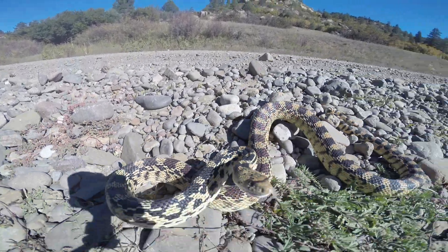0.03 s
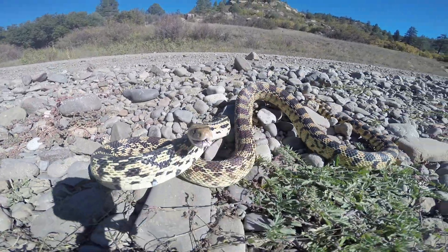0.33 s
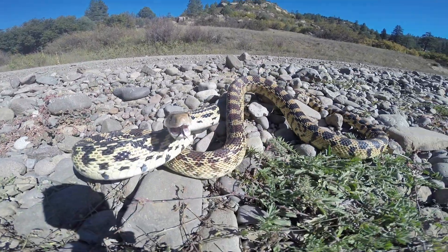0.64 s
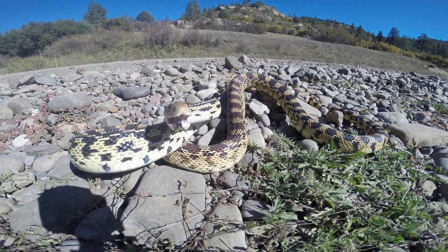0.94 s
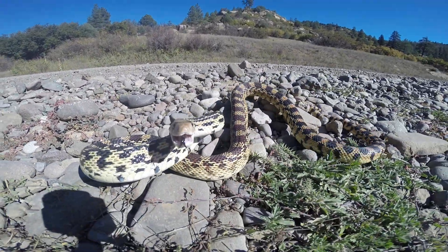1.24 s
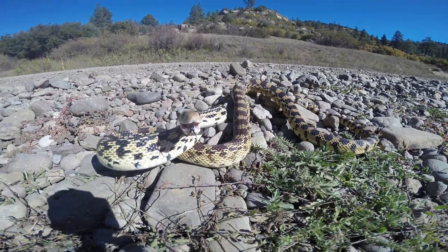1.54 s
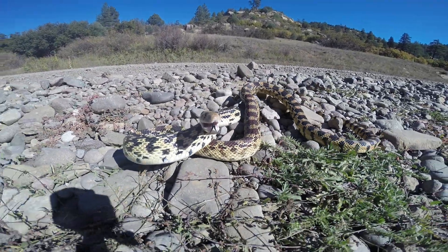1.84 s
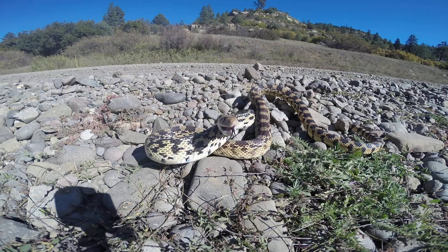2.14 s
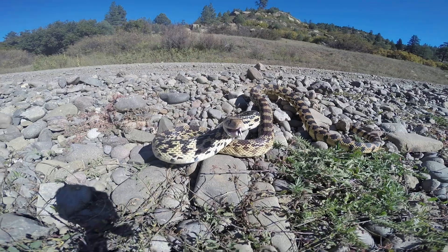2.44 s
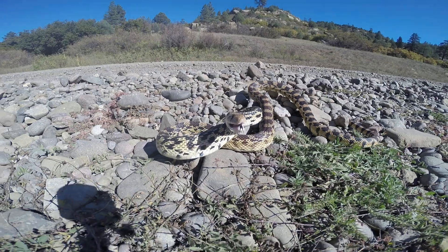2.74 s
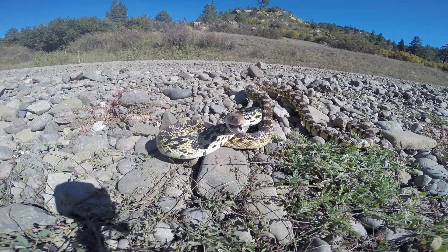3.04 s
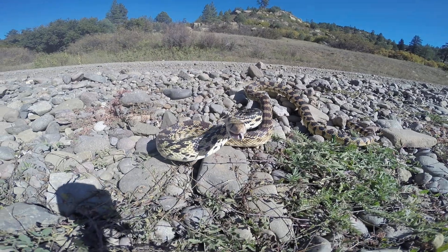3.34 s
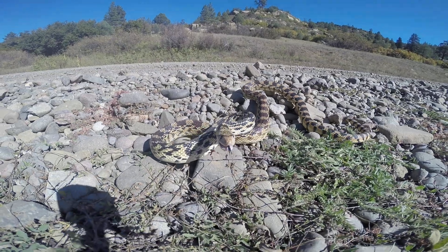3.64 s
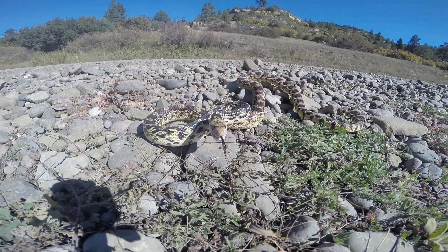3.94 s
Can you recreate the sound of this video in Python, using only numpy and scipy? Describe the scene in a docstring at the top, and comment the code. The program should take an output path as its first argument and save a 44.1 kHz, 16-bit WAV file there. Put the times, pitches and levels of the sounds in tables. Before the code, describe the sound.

A snake hisses close by for the whole four seconds, starting softly, swelling until about 2 seconds and then holding, its airy tone shifting slightly. Scales brush faintly on stone in the first half second. A few small pebbles click between about 2.7 and 3.2 seconds. Low wind gusts rumble on the microphone throughout, strongest in the first two seconds, with scattered soft handling bumps.

```python
"""A large snake gives one long hiss on stony ground, close to a moving hand-held camera.
Air rushes through its open mouth: noise in many narrow resonances that shift as the head turns,
with a faint, bright echo off the stones. Its scales brush the ground and a few pebbles click.
Underneath, the grip bumps the camera softly, wind rumbles on the microphone and the open air
lays down a quiet bed."""
import sys
import numpy as np
from scipy import signal
from scipy.fft import rfft, irfft
from scipy.io import wavfile
from scipy.ndimage import uniform_filter1d

SR = 44100
rng = np.random.default_rng(int(sys.argv[2]) if len(sys.argv) > 2 else 0)


def to_wav(sig):
    """Store sig (one row per channel, or 1-D mono) as 16-bit WAV at the path in sys.argv[1].

    Samples outside -1..1 are clipped; the rate is SR.
    """
    pcm = np.clip(np.atleast_2d(sig), -1, 1) * 32767
    pcm = np.round(pcm).astype(np.int16)
    wavfile.write(sys.argv[1], SR, pcm.T)  # frames by channels


N = 176400
FFT_SIZE, HOP = 1024, 256
BIN_HZ = np.fft.rfftfreq(FFT_SIZE, 1 / SR)
FRAME_S = np.arange(N // HOP + 5) * HOP / SR
TIME = np.arange(N) / SR

# force of the hiss: t/s, level/dB before the trim
HISS_FORCE = [(0, -58.5), (.14, -59.5), (.43, -55), (.75, -53), (.95, -51.3), (1.3, -49.5), (1.6, -50.5),
              (2.15, -48.5), (2.7, -48.5), (3.2, -49), (3.62, -49), (3.74, -50.5), (3.93, -48), (4, -49)]
# treble shelf against the body of the hiss: t/s, level/dB
HISS_TREBLE = [(0, -10), (.14, -2), (.36, 0), (.55, -3), (.8, -2), (1.2, -0.5), (1.6, 1), (2.3, 0.5),
               (3.2, -1), (3.6, 0), (3.9, 2.5)]
HISS_TRIM_DB, SHELF_FROM_HZ, SHELF_FULL_HZ = 0.5, 7100, 10300
# head movement: t/s, pose (0 reaching forward, 1 drawn back)
HEAD_POSE = [(0, 0.74), (.6, 0.2), (1.3, 0), (1.75, 0.14), (2.25, 0.99), (3.0, 1), (3.6, 0.8), (4, .7)]
# the mouth's shape bends its formants and notches: t/s, shift/%
MOUTH_DRIFT = [(0, 0), (.7, 1), (1.3, 0.3), (1.8, 0), (2.3, 0), (3.1, 2.3), (3.6, 1.5), (3.85, -.5),
               (4, -.5)]
# broad rush of breath under the resonances: f/Hz, relative level/dB
BREATH_EQ = [(900, -29.5), (1600, -12.5), (2150, -19.5), (2700, -14), (4300, -6.5), (5250, -15.5),
             (5800, -9.5), (7800, -9), (10000, -20), (11500, -19), (13600, -18), (15300, -19)]
# mouth formants: f/Hz before drift, width/Hz, relative level/dB forward, relative level/dB drawn back
FORMANTS = [(1730, 350, -10, -38), (2654, 390, -2, -7.5), (2930, 240, -0.5, -3.5), (3720, 215, -4, 2),
            (4000, 380, -6.5, -16), (4800, 170, -11, -13), (5652, 373, -4, 2.5), (6745, 184, -3, 3),
            (7310, 260, -7, 3), (8560, 200, -11.5, -0.5), (10200, 310, -16, -7), (10700, 220, -31, -15),
            (14450, 550, -18, -8.5)]
# hollows between the formants: f/Hz before drift, width/Hz, share of power lost
MOUTH_NOTCHES = [(2140, 170, 0.5), (5270, 190, 0.4), (6460, 120, 0.26), (8180, 130, 0.25)]
# seven resonances that glide and swell on their own, low to high: t/s, f/Hz, relative level/dB
THIN_PEAK = [(0, 3330, 0.5), (.55, 3260, 4.5), (1, 3300, -1.5), (1.4, 3270, -16), (2.05, 3320, 0),
             (3.1, 3350, 2.5), (3.6, 3370, 4.5), (4, 3250, 0)]
LOW_PEAK = [(0, 4350, -1.5), (.7, 4440, -3.5), (1.2, 4460, 3.5), (1.7, 4500, -2), (2.3, 4320, -4),
            (3.0, 4450, -3), (3.45, 4460, -7), (3.9, 4520, 3.5), (4, 4600, 2)]
MID_PEAK = [(0, 6160, 10.5), (.2, 6230, 0.5), (.85, 6170, 6.5), (1.3, 5960, 2), (1.9, 6110, 4),
            (2.15, 6090, 5.5), (2.9, 6200, 1), (3.4, 6300, -6), (3.9, 6100, 5.5)]
HIGH_PEAK = [(0, 7800, 3), (.45, 7540, 0), (1.1, 7850, -8.5), (1.6, 7650, -1.5), (2.15, 7750, 4.5),
             (2.5, 7700, 1.5), (3.2, 7880, 6), (3.62, 7960, 6.5), (3.8, 7850, 2), (4, 7540, 7)]
BRIGHT_PEAK = [(0, 9000, -10), (.35, 9550, -3), (.75, 9640, -7), (1.25, 9200, 3.5), (1.58, 9240, -0.5),
               (1.8, 9370, -4), (2.1, 9630, 1.5), (2.45, 9940, -4.5), (3.05, 9440, -8.5), (3.5, 9170, -1.5),
               (3.9, 9600, -5)]
LOW_SIZZLE = [(0, 9500, -14), (.9, 9900, -11), (1.3, 10900, -10), (1.8, 11100, -7.5), (2.2, 11100, -12),
              (2.9, 11600, -12), (3.4, 11300, -11), (4, 11300, -12)]
HIGH_SIZZLE = [(0, 11200, -13), (.5, 11400, -10), (.9, 12000, -12), (1.4, 12600, -11), (1.85, 13000, -18),
               (2.4, 12500, -20), (3.1, 11900, -25), (3.55, 12300, -15), (4, 13200, -16)]
# those seven in the same order: width/Hz
PEAK_WIDTHS_HZ = (136, 413, 256, 380, 690, 380, 696)
# echo off the stones as the camera moves: t/s, delay/ms
ECHO_DELAY = [(0, 2.2), (1, 1.83), (2, 1.68), (3, 1.78), (4, 1.66)]
# strokes of scales on stone: t/s, length/s, level/dB
SCALE_STROKES = [(0.161, .07, -57), (0.293, 0.065, -60)]
# tone of the scales: f/Hz, relative level/dB
SCALE_EQ = [(400, -25), (620, 2), (1200, -19), (1780, 7), (2200, -12), (3800, -8), (5200, -15), (7400, 5),
            (8200, -1), (9500, -22), (15000, -35)]
# pebble knocks: t/s, relative level/dB
PEBBLE_HITS = [(2.743, -11), (2.904, -10), (2.979, -8.5), (3.2207, -1)]
# ring of a pebble: f/Hz, relative level/dB, decay/s
PEBBLE_MODES = [(3120, -26.5, 0.00076), (1900, -46, 0.00056), (3800, -40, .0005)]
# bumps of the grip: t/s, relative level/dB, decay/s
GRIP_BUMPS = [(.217, -53, .035), (.362, -42.5, 0.014), (1.051, -54, 0.018), (1.275, -45.5, 0.013),
              (1.83, -55, 0.038), (2.131, -48.5, .02), (2.63, -58, 0.017), (3.255, -44, 0.022),
              (3.553, -53, 0.014)]
# tone of the grip's rub: f/Hz, relative level/dB
RUB_EQ = [(40, -14), (90, -29.5), (130, 10), (180, -19.5), (250, -6.5), (360, -13.5), (520, -27),
          (1500, -38)]
# gusts on the microphone: t/s, level/dB before the trim
WIND_GUSTS = [(0.0, -24.5), (0.13, -28), (0.77, -27), (0.9, -34), (1.5, -28.5), (1.59, -40.5),
              (1.65, -24.5), (1.96, -45.5), (1.98, -34), (2.08, -32.5), (2.14, -41), (2.55, -32),
              (2.56, -37), (3.15, -34.5), (3.17, -32), (3.56, -39.5), (3.82, -30.5), (4.0, -36.5)]
# tone of the wind: f/Hz, relative level/dB
WIND_EQ = [(8, -22), (18, -3), (26, 5.5), (40, -2.5), (50, -10), (62, -21.5), (80, -26.5), (110, -36),
           (200, -47.5), (500, -69)]
# tone of the open air: f/Hz, relative level/dB
AIR_EQ = [(30, 8.5), (70, 13.5), (100, 7.5), (130, 8.5), (170, 4), (250, 2), (400, -1), (700, -4),
          (1200, -7.5), (2200, -11), (6000, -24.5), (15000, -34)]


def hiss(ripple_db=0.79, flutter_db=0.63):
    """Turbulent breath through the mouth, with a slow ripple and a quick flutter in its tone."""
    t = FRAME_S[:, None]
    shelf = np.clip((BIN_HZ - SHELF_FROM_HZ) / (SHELF_FULL_HZ - SHELF_FROM_HZ), 0, 1)
    treble = amp(shelf * curve(HISS_TREBLE, t))
    power = mouth_response(t) * (treble * stone_echo(t)) ** 2
    tone = np.sqrt(power / power.sum(1, keepdims=True))  # equal power in every frame
    ripple = ripple_db * wobble(span_s=0.43, span_hz=150)
    flutter = flutter_db * wobble(span_s=0.018, span_hz=7700)
    return moving_noise(tone * amp(ripple + flutter)) * amp(curve(HISS_FORCE, TIME) + HISS_TRIM_DB)


def mouth_response(t):
    """Power spectrum of the open mouth: broad breath, formants, gliding peaks and notches."""
    pose = curve(HEAD_POSE, t)
    bend = 1 + curve(MOUTH_DRIFT, t) / 100
    power = eq_gain(BREATH_EQ, BIN_HZ) ** 2
    for hz, width, forward_db, back_db in FORMANTS:
        power = power + resonance(hz * bend, width, forward_db + (back_db - forward_db) * pose)
    peaks = (THIN_PEAK, LOW_PEAK, MID_PEAK, HIGH_PEAK, BRIGHT_PEAK, LOW_SIZZLE, HIGH_SIZZLE)
    for peak, width in zip(peaks, PEAK_WIDTHS_HZ):
        power += resonance(curve(peak, t), width, curve(peak, t, column=2))
    for hz, width, loss in MOUTH_NOTCHES:
        power *= 1 - loss * np.exp(-((BIN_HZ - hz * bend) / width) ** 2)
    return power


def resonance(centre_hz, width_hz, db):
    """Power response of one steep resonance."""
    return (amp(db) / (1 + 2 * ((BIN_HZ - centre_hz) / width_hz) ** 2)) ** 2


def stone_echo(t, echo_db=-17, full_hz=9000):
    """Moving comb filter from one short echo; small stones reflect mostly treble."""
    delay_s = curve(ECHO_DELAY, t) / 1000
    reflection = amp(echo_db) * np.minimum(BIN_HZ / full_hz, 1)
    return abs(1 + reflection * np.exp(-2j * np.pi * BIN_HZ * delay_s))


def scale_scrapes():
    """Scales brush the stones in short, rounded swells of noise."""
    envelope = np.zeros(N)
    for start, length, db in SCALE_STROKES:
        progress = np.clip((TIME - start) / length, 0, 1)
        envelope += amp(db) * np.sqrt(abs(np.sin(np.pi * progress)))
    return envelope * steady_noise(SCALE_EQ)


def pebble_clicks(attack_s=0.00023):
    """Small stones knock together and ring for a few cycles."""
    out, t = np.zeros(N), TIME[:1024]
    ring = sum(amp(db) * np.exp(-t / decay) * np.sin(2 * np.pi * hz * t)
               for hz, db, decay in PEBBLE_MODES)
    click = np.minimum(t / attack_s, 1) * ring
    for start, db in PEBBLE_HITS:
        first = round(start * SR)
        out[first:first + len(click)] += amp(db) * click
    return out


def grip_bumps(attack_s=0.011, thud_hz=126, thud_db=-2, rub_db=-1):
    """Short dull bumps: a rub of the grip and a low thud in the camera's housing."""
    out = np.zeros(N)
    rub = amp(rub_db) * steady_noise(RUB_EQ)
    for start, db, decay in GRIP_BUMPS:
        age = np.maximum(TIME - start, 0)
        envelope = np.minimum(age / attack_s, 1) * np.exp(-np.maximum(age - attack_s, 0) / decay)
        thud = amp(thud_db) * np.sin(2 * np.pi * thud_hz * age)
        out += amp(db) * envelope * (rub + thud)
    return out


def wind_rumble(trim_db=-1.5):
    """Deep buffeting on the microphone, rising and falling with the gusts."""
    rumble = steady_noise(WIND_EQ)
    running_rms = np.sqrt(uniform_filter1d(rumble ** 2, size=9000) + 1e-9)
    levelled = rumble / running_rms
    return levelled * amp(curve(WIND_GUSTS, TIME) + trim_db)


def air_bed(level_db=-57, stir_db=3, stir_below_hz=350, fade_from_db=-6.5, fade_s=0.27):
    """Quiet outdoor wash that fades up quickly, its low end stirred by the breeze."""
    stir = stir_db * wobble(span_s=0.018, span_hz=570) / (1 + (BIN_HZ / stir_below_hz) ** 2)
    fade_db = fade_from_db * np.clip(1 - TIME / fade_s, 0, 1)
    return moving_noise(eq_gain(AIR_EQ, BIN_HZ) * amp(stir)) * amp(level_db + fade_db)


def amp(db):
    """Decibels to gain."""
    return 10 ** (np.asarray(db) / 20)


def unit_rms(x):
    """Scales to rms 1."""
    return x / np.sqrt(np.mean(x ** 2) + 1e-20)


def curve(rows, t, column=1):
    """One column of an automation curve at the times t."""
    rows = np.array(rows)
    return np.interp(t, rows[:, 0], rows[:, column])


def eq_gain(eq, hz):
    """Gain of an EQ curve, joined on a log-frequency axis."""
    f, db = np.transpose(eq)
    return amp(np.interp(np.log(hz + 1), np.log(f + 1), db))


def steady_noise(eq):
    """White noise through an EQ curve, at rms 1."""
    white = rfft(rng.standard_normal(N))
    return unit_rms(irfft(white * eq_gain(eq, np.fft.rfftfreq(N, 1 / SR)), N))


def moving_noise(gain):
    """Noise whose spectrum follows a frames x bins gain, at rms 1."""
    white = rng.standard_normal(gain.shape) + 1j * rng.standard_normal(gain.shape)
    _, sound = signal.istft((white * gain).T, nperseg=FFT_SIZE, noverlap=FFT_SIZE - HOP)
    return unit_rms(sound[:N])


def wobble(span_s, span_hz):
    """Smooth random modulation over frames and bins, at rms 1."""
    shape = (len(FRAME_S), len(BIN_HZ))
    white = np.fft.rfft2(rng.standard_normal(shape))
    per_s = np.fft.fftfreq(len(FRAME_S), HOP / SR)[:, None]
    per_hz = np.fft.rfftfreq(len(BIN_HZ), SR / FFT_SIZE)
    blur = np.exp(-2 * ((per_s * span_s) ** 2 + (per_hz * span_hz) ** 2))
    return unit_rms(np.fft.irfft2(white * blur, shape))


def scene():
    """Mono mix of the snake, the weather and the small knocks."""
    return (hiss() + scale_scrapes() + wind_rumble() + air_bed() + grip_bumps() + pebble_clicks())[None]


def record(dry, cutoff_hz=15280):
    """The camera's band limit: a steep low-pass on the whole mix."""
    lowpass = signal.firwin(511, cutoff_hz, window=("kaiser", 9), fs=SR)
    return signal.oaconvolve(dry, lowpass[None], "same")


dry = scene()
out = record(dry)
to_wav(out)
```